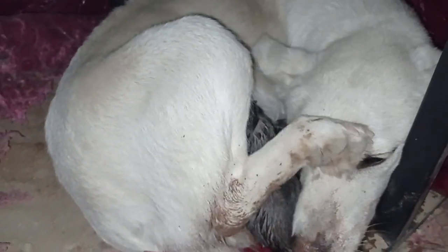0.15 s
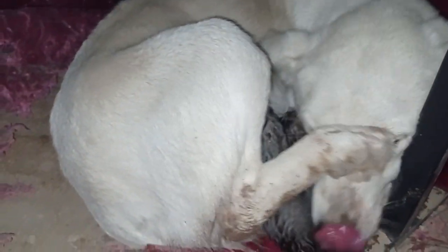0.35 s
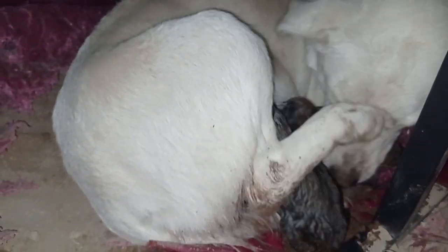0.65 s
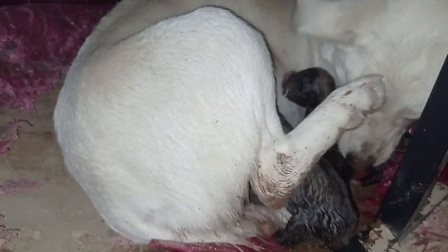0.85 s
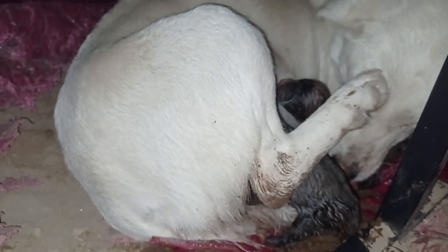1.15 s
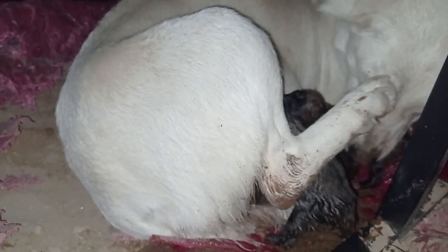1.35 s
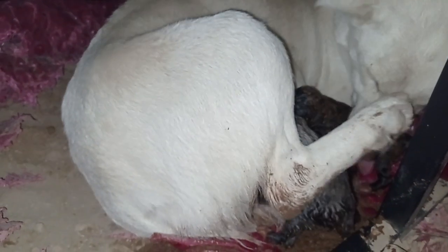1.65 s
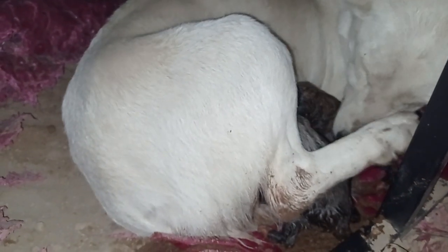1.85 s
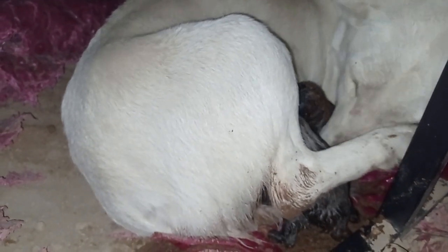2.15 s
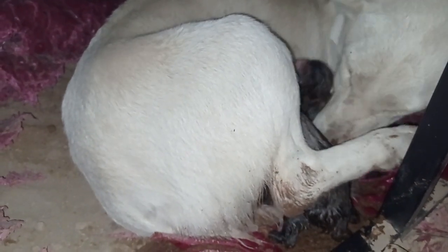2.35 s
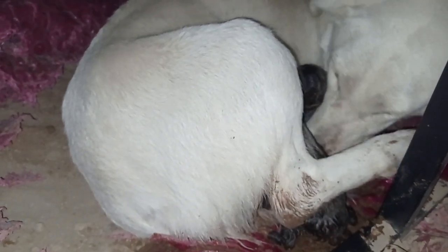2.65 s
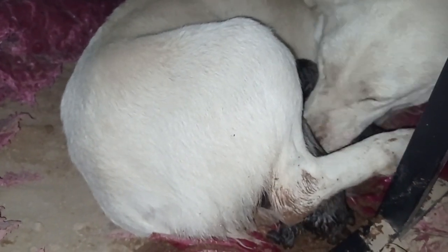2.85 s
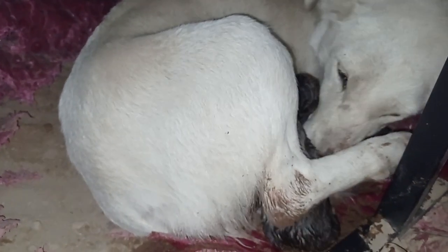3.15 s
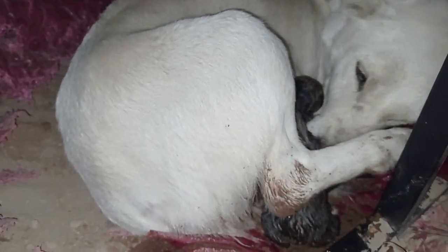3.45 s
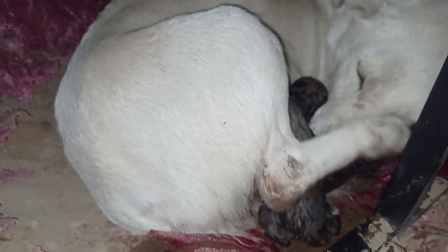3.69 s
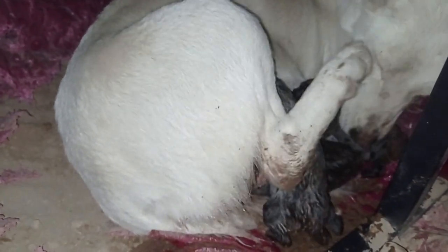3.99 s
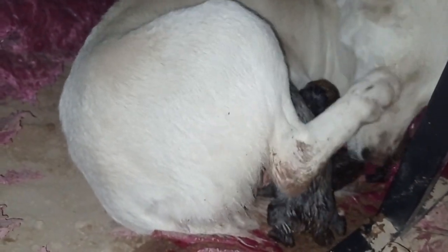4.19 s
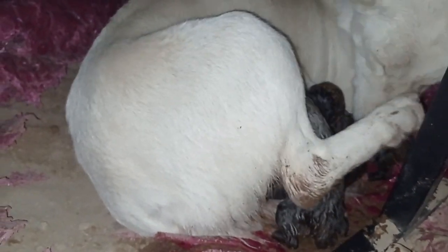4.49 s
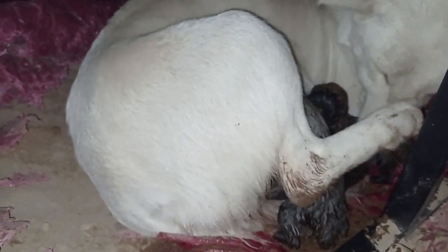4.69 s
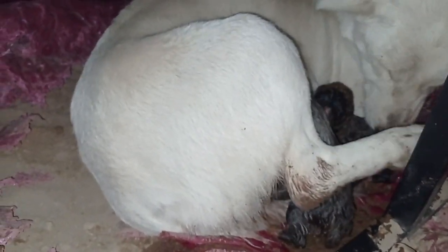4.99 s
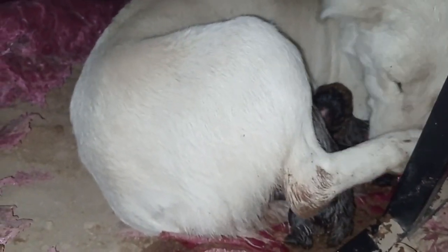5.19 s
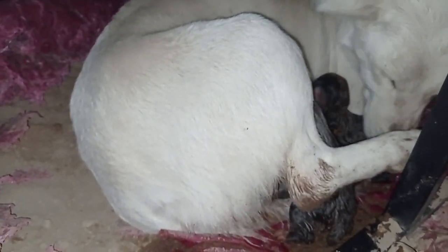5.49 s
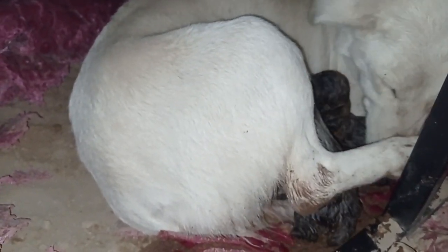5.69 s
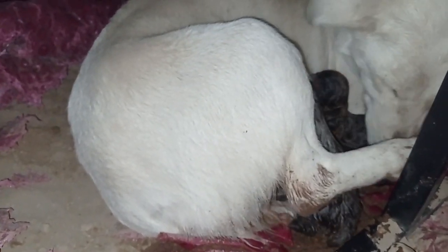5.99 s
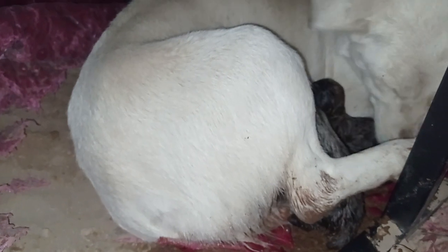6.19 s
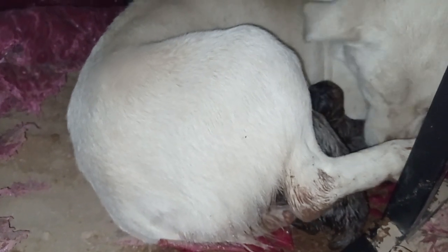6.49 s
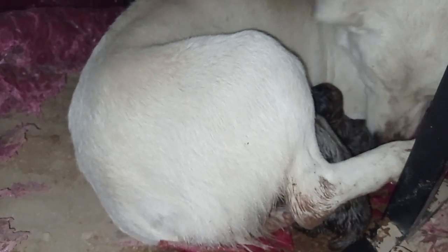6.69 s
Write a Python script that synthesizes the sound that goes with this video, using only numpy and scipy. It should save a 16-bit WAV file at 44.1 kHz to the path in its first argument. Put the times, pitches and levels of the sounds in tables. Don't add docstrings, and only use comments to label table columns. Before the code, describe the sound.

Wet licking begins softly, then a tiny pup cries with a high, wobbling squeal. Licking continues with dull slaps, rounded pops and crisp little ticks over rubbing fur. A second squeal peaks early and sinks away; a third climbs to a strained peak and falls. Only licks and short grunts follow. Very close, indoors, over a quiet low room hum.

```python
import sys
import numpy as np
from scipy import signal
from scipy.fft import irfft
from scipy.io import wavfile
from scipy.ndimage import uniform_filter1d

SR = 44100
rng = np.random.default_rng(int(sys.argv[2]) if len(sys.argv) > 2 else 0)


def attenuation_scalar(level_db):
    decades = np.asarray(level_db, float) / 20
    return 10 ** decades


def dump(signal):
    limited = np.clip(np.atleast_2d(signal).T, -1, 1)
    pcm = np.round(limited * 32767).astype(np.int16)
    wavfile.write(sys.argv[1], SR, pcm)


N = 301644

# time in seconds, pitch in Hz, effort in dB,
# jaw in dB that lifts the 2nd partial, edge in dB of the upper partials.
CRY_WAVERING = [
    (0.435, 592, -46, 5.5, -2),
    (0.543, 637.3, -38, 5.5, -6.5),
    (0.633, 609, -29.5, 5, -12.5),
    (0.706, 542, -34, 3, -12),
    (0.862, 608.4, -32, 0.5, -11.5),
    (0.988, 622.7, -30, -0.5, -18),
    (1.084, 489, -39.5, 3, -8),
    (1.18, 559, -33, 4.2, -8.5),
    (1.33, 525, -33, 2.5, -11),
]
CRY_BREAKING = [
    (2.834, 598, -45.5, -12, -3.5),
    (3.04, 698, -28, -9, -12.5),
    (3.125, 614.3, -28.5, -9.5, -16.5),
    (3.213, 619, -34, -10, -6),
    (3.388, 607.8, -31.5, -3, -12.5),
    (3.52, 592, -32, -3, -11),
    (3.624, 478.6, -40, 4, -12),
    (3.694, 446, -45, 5, -11.5),
    (3.745, 370, -44, -8, -22),
]
CRY_CLIMBING = [
    (4.455, 571, -45.5, 3, -1.5),
    (4.592, 588, -36, 1, -4.5),
    (4.659, 544, -40, 4, -2),
    (4.829, 592.3, -36, 3, -2.5),
    (5.136, 639.6, -28.5, -5.5, -20.5),
    (5.283, 675.7, -27, -19, -23.5),
    (5.36, 595, -29, -5, -19),
    (5.507, 495.4, -37.5, 3, -15),
    (5.595, 402, -44, -5, -9),
]
WHIMPER = [
    (4.3, 850, -76, 4, -8),
    (4.36, 820, -68, 6, -10),
    (4.395, 910, -67, 5, -10),
]
CREAK = [
    (6.746, 221, -63, 3, 0),
    (6.785, 353.6, -51, 0, -7),
    (6.807, 458, -36, -1, -23),
    (6.825, 403, -34.5, -9, -28),
    (6.85, 500, -37, -16, -26),
]
# start in seconds, length in seconds, effort in dB, pitch in Hz.
GRUNTS = [
    (1.905, .088, -35, 435),
    (6.252, .037, -35, 420),
]
# share of its length, pitch ratio, effort in dB, jaw in dB, edge in dB.
GRUNT_SHAPE = [
    (0, 1.02, -20, -3, 6),
    (.22, 1.22, -5.5, 1.5, -6),
    (.36, 1.02, -0.5, -6.5, -18.5),
    (.6, .99, -1.5, -26, -26),
    (1, 1.06, -24, -30, -17),
]
# time in seconds, half width in seconds, pitch ratio,
# overtone change in dB, rasp of leaking air in dB.
SLIPS = [(1.0, .025, .98, 3, 14), (1.262, 0.029, .96, -6, 14), (1.319, .006, .84, -3, 4),
         (1.325, .024, 1.0, -8, 35), (6.256, .008, 1.14, 0, 0), (1.035, .03, .965, 0, 0),
         (3.44, .025, .987, 0, 0), (4.88, .02, .988, 0, 0), (5.02, .04, 1.013, 0, 0),
         (5.565, .025, .972, 0, 6), (5.325, .03, .984, 0, 0), (3.08, .027, 1.26, -12, 28),
         (3.276, .04, .955, -1.5, 1.5), (3.75, .02, .97, -3, 22), (4.485, .022, 1.018, 0.5, 1.5),
         (4.53, 0.0179, .985, 1.5, 0.5), (5.442, 0.029, 0.98, -7, 12), (5.59, .025, .99, 1.5, 18)]
# frequency in Hz, level in dB.
THROAT = [(1800, 1), (2500, 1), (3100, -3.5), (4400, -23.5), (5500, -32), (6700, -21), (7800, -26),
          (9100, -24), (11000, -32.5), (15000, -38.5)]
# frequency in Hz, level in dB.
THIRD = [(1300, -9), (1500, -11), (1700, -8.5), (1850, -15), (1980, -13), (2090, -6.5), (2450, -18.5)]
# time in seconds, opening in dB that lifts the 3-4 kHz partials,
# strain in dB that lifts those above.
MOUTH = [(.45, -10, 6), (.6, -11.5, 5.5), (.85, -21, -10), (0.998, -7.5, 8.5), (1.2, -4.5, 4.5),
         (2.95, -11.5, 2.5), (3.15, -7, -1.5), (3.45, -1.5, 6.5), (3.65, 6, 3), (4.6, -8, -5),
         (4.9, -5, -4), (5.15, 8.5, 14), (5.349, 8.5, 16), (5.5, -1, -11), (6.8, -34, -12)]
# time in seconds, half width in seconds, frequency in Hz, change in dB.
SHADES = [(.6, .05, 1850, -3), (.6, .05, 2450, 3), (.75, .05, 1700, -2), (.75, .05, 2250, 2),
          (.92, .05, 3080, -14), (1.0, .02, 1750, -5), (1.01, .03, 2800, 6), (1.11, .03, 1900, -4),
          (1.2, .03, 2200, -5), (1.285, .04, 2640, 11), (1.327, .013, 960, -18), (1.333, .016, 1560, -12),
          (1.285, .03, 1570, -9), (1.28, .04, 2090, -10), (1.92, .015, 2900, 14), (1.945, .01, 1050, -10),
          (2.86, .04, 1820, -6), (2.94, .07, 2600, 5), (2.93, .03, 1950, 5), (2.96, .02, 1320, -5),
          (3.01, .04, 3400, -10), (3.04, .015, 2800, -12), (3.08, .025, 1640, 5), (3.079, .014, 2460, 9),
          (3.205, .035, 3100, -19), (3.235, .02, 1820, -9), (3.36, .03, 1820, -8), (3.48, .07, 1780, 5),
          (3.48, .06, 3570, 10), (3.56, .02, 1120, -5), (3.585, .03, 3200, 8), (3.65, .05, 2250, -8),
          (3.7, .04, 3000, 6), (4.45, .045, 1650, -10), (4.82, .04, 1780, -4), (4.94, .04, 2430, 4),
          (5.06, .04, 1890, 4), (5.12, .02, 2550, -8), (5.21, .05, 1970, 3), (5.26, .035, 2670, 7),
          (5.31, .03, 3250, -11), (5.32, .015, 1890, -7), (5.4, .02, 2280, -11), (5.52, .02, 1910, -9),
          (6.257, .012, 1000, 11), (6.262, .018, 1400, -12), (6.268, .012, 1800, 13),
          (6.765, .035, 1000, 20), (6.812, .03, 1800, 22), (6.82, .022, 1300, -14)]
MORE_SHADES = [(1.2, .07, 3350, -9), (1.2, .04, 3870, -9), (3.08, .03, 3200, 8), (3.56, .04, 2250, -6),
               (3.56, .04, 2780, -7), (5.3, .015, 1310, -10), (4.46, .02, 3650, -14), (3.28, .04, 590, -3),
               (3.08, .025, 820, 2.5), (4.7, .04, 3850, -11), (.93, .03, 2450, 4), (3.32, .2, 4400, 8),
               (3.4, .13, 5400, -9), (.56, .09, 3750, -7), (.56, .1, 5000, -6), (.55, .06, 6250, -6)]

# time in seconds, peak in dB, cavity in Hz.
SLAPS = [(0.1306, -46, 385), (.68, -40, 897), (1.6813, -47, 500), (1.9345, -35, 620), (2.3285, -39.5, 890),
         (2.671, -30, 840), (2.8822, -34, 882), (3.105, -29, 760), (3.1862, -29, 1020),
         (3.3937, -38.5, 360), (3.586, -34.5, 590), (4.0091, -32.5, 526), (4.0352, -42, 1100),
         (4.049, -42.5, 418), (4.2435, -39, 1900), (4.5178, -14.5, 1890), (4.731, -42, 890),
         (5.13, -35, 500), (5.94, -38.5, 576), (5.9987, -40.5, 302), (6.0147, -39.5, 625),
         (6.2164, -47.5, 280), (6.266, -32, 800), (6.4602, -43.5, 710), (6.5647, -44, 820)]
# time in seconds, peak in dB, cavity in Hz.
POPS = [(0.0936, -39.5, 1300), (0.1176, -36, 533), (0.1567, -43, 640), (0.2634, -37.5, 1520),
        (1.0137, -39, 2940), (1.3018, -38, 2600), (1.316, -30, 1100), (2.3111, -44, 1490),
        (2.4098, -38.5, 566), (2.4214, -41.5, 1150), (2.5259, -43, 1970), (2.7864, -33.5, 820),
        (2.9102, -23, 2450), (5.9051, -35, 680), (2.9518, -37, 1653), (3.7478, -37, 420),
        (3.7943, -45, 1140), (3.8081, -35.5, 745), (3.8632, -37.5, 736), (4.1469, -38.5, 714),
        (4.1789, -41, 1190), (4.7746, -32, 3050), (5.02, -37, 700), (5.151, -35, 520), (5.444, -32, 736),
        (5.5953, -33.5, 950), (6.3695, -42.5, 805), (6.5386, -45.5, 1600), (6.6794, -40, 660)]
# time in seconds, peak in dB, cavity in Hz.
PLOPS = [
    (1.028, -39, 603),
    (1.7952, -47.5, 1390),
    (1.9672, -44, 1650),
    (2.3401, -43, 660),
    (2.5027, -40.5, 661),
    (4.0004, -39, 650),
    (4.016, -41.5, 364),
    (5.6047, -34, 596),
    (6.3478, -47, 754),
]
# time in seconds, peak in dB, cavity in Hz.
GULPS = [
    (1.398, -52, 520),
    (1.447, -50, 620),
    (2.097, -46, 640),
    (3.87, -50, 800),
    (5.125, -39, 480),
    (4.002, -46, 1720),
    (5.992, -41, 520),
    (6.541, -43, 420),
    (6.592, -52, 620),
]
# time in seconds,
# peak in dB, cavity in Hz.
MORE_POPS = [(1.386, -50, 1400), (1.481, -50, 400), (1.591, -48, 620), (1.964, -42, 2200), (2.044, -47, 600),
             (2.153, -52, 2900), (2.163, -50, 550), (3.038, -38, 1000), (3.307, -42, 950), (3.36, -42, 420),
             (3.483, -41, 420), (3.549, -41, 450), (3.562, -39, 700), (3.573, -37, 750), (3.778, -48, 450),
             (3.84, -50, 650), (5.33, -48, 5000), (5.388, -40, 800), (5.48, -38, 1200), (5.542, -42, 900),
             (5.627, -45, 1300), (5.628, -48, 8600), (5.83, -55, 1100), (6.402, -48, 600), (6.461, -48, 2000),
             (6.474, -46, 900), (6.525, -48, 600), (6.539, -44, 3500), (6.556, -46, 2600), (6.683, -48, 1700),
             (6.694, -49, 900), (6.737, -52, 900), (.027, -48, 700), (.094, -52, 6000), (.16, -49, 8500),
             (.357, -46, 750), (.366, -48, 9000), (1.309, -37, 2100), (2.295, -49, 900), (2.303, -49, 1500),
             (2.363, -51, 7000), (2.41, -45, 9000), (2.43, -43, 900), (2.535, -46, 700), (2.562, -51, 4000),
             (3.8, -51, 9500), (3.863, -51, 5000), (3.9, -49, 7000), (4.137, -47, 700), (4.322, -50, 2500),
             (5.052, -42, 800), (5.903, -49, 8000), (6.478, -51, 7500)]
# time in seconds, peak in dB, frequency in Hz.
TICKS = [(0.0084, -38.5, 10500), (0.0272, -31.5, 9100), (0.2608, -33.5, 8140), (0.5656, -35, 9300),
         (5.541, -40, 7000), (1.3004, -33, 4513), (3.915, -43, 6300), (1.6202, -39, 9350),
         (1.6955, -41.5, 9210), (1.732, -31.5, 8700), (1.805, -38, 8700), (1.962, -34, 8100),
         (2.0996, -45.5, 6000), (2.1607, -44, 8550), (2.4199, -35.5, 9500), (2.6479, -43, 9160),
         (2.6702, -39.5, 7960), (4.7272, -28.5, 8610), (4.773, -37, 7040), (5.3986, -34, 9500),
         (5.5584, -34, 9100), (5.5887, -39, 8300), (5.8568, -34.5, 9300), (5.937, -40, 6460),
         (5.96, -40, 9000), (6.3689, -40, 8400), (6.5227, -39, 7050), (6.538, -28.5, 8800),
         (6.555, -38, 8600)]
# time of strongest drag in seconds, time to fade 10 dB in seconds,
# level in dB, wetness in dB of hiss over rustle.
STROKES = [(0.06, 0.7, -59, -1.5), (0.34, 0.34, -54.5, -1), (0.69, 0.17, -51, -3.5), (1.0, 0.34, -60, 3),
           (1.28, 0.08, -50, 0), (1.5, .55, -54.5, -4), (1.94, 0.15, -51, -8.5), (2.32, .05, -56, -10),
           (2.429, 0.07, -50, -7.5), (2.52, 0.05, -58.5, -11), (2.7, .09, -50.5, -8),
           (2.81, .16, -47.5, -10), (3.1, 0.15, -51.5, 2), (3.45, 0.36, -54.5, -7), (3.71, 0.05, -51.5, -7),
           (4.031, .045, -49.5, -7.5), (4.23, 0.22, -58, 1.5), (4.33, 0.03, -58, -12),
           (4.52, 0.05, -44.5, -17), (4.76, 0.14, -54, -22), (4.97, 0.24, -60, 2), (5.14, 0.1, -51, 2.2),
           (5.44, .14, -49.5, .6), (5.59, .06, -48.5, -13), (6.0, 0.08, -55.5, -2.2),
           (6.29, 0.08, -50.5, -6), (6.471, 0, -52, -6), (6.549, 0.0254, -47, -4), (6.73, 0.14, -64.5, 3),
           (6.8, 0.05, -45, -16), (3.63, .14, -62, 6), (5.63, .03, -58, 1), (5.83, .12, -59.5, -4),
           (6.31, .05, -62, 7), (6.78, .08, -66, 6)]
# frequency in Hz, level in dB per Hz.
RUSTLE = [(120, 4.5), (300, -22), (600, 5), (1200, -1.5), (2700, -2.5), (4300, -24), (9000, -25)]
# frequency in Hz, level in dB per Hz.
HISS = [(2500, -9.5), (5000, -9.5), (7300, -5.5), (8900, 2.5), (10500, -7), (12500, -14), (16000, -9)]

# frequency in Hz, left minus right in dB.
NEAR_LEAN = [(700, 0), (1150, -3), (1800, 4.2), (2400, 0), (3600, 4), (6000, 0)]
# frequency in Hz, left minus right in dB.
PORT_LEAN = [(100, 2), (700, 0.45), (1290, -1), (3000, 4.5), (9000, -2)]
# frequency in Hz, left-right likeness as a share.
SAME = [(60, 0.76), (400, 0.61), (1400, 0.21), (5000, 0.01)]
# frequency in Hz, level in dB per Hz.
HUM = [(40, -44), (58, -18), (78, -4), (101, 5.5), (125, -8.5), (210, -5), (600, -13), (1600, -25),
       (4200, -26), (8800, -33), (11000, -28), (16000, -31)]

ATTACK_S, ATTACK_DB, SCOOP = .05, -22, .86
RELEASE_S, RELEASE_DB, CLOSING_DB = 0.023, -28, -15
PATCHY_DB, SHRILL_PATCHY_DB = 2.8, 3.5
SHADE_HZ = 230
SLAP_CYCLES, POP_CYCLES, PLOP_CYCLES, GULP_CYCLES = 2.05, 3.0, 4.2, 8.5
RISE_SHARE = .8
HUM_DB = -60.5


def cry(rows):
    s, hz, db, jaw, edge = rows[0]
    swell = [(s - ATTACK_S, hz * SCOOP, db + ATTACK_DB, jaw - 6, edge - 8),
             (s - .6 * ATTACK_S, hz * (.4 + .6 * SCOOP), db + .15 * ATTACK_DB, jaw - 7, edge - 9)]
    s, hz, db, jaw, edge = rows[-1]
    shut = (s + RELEASE_S, hz, db + RELEASE_DB, jaw + CLOSING_DB, edge + 0.33 * CLOSING_DB)
    return [*swell, *rows, shut]


def grunt(s, length, effort_db, pitch_hz):
    return [(s + share * length, pitch_hz * ratio, effort_db + db, jaw, edge)
            for share, ratio, db, jaw, edge in GRUNT_SHAPE]


def voice(rows):
    s, *columns = np.transpose(rows)
    step = 50
    t = np.arange(s[0], s[-1], step / SR)
    hz, effort_db, jaw_db, edge_db = (uniform_filter1d(np.interp(t, s, c), size=10) for c in columns)
    hz, slip_db, rasp_db = fold_slips(t, hz)
    upper_db = effort_db + edge_db + slip_db
    k = np.arange(1, 27)[:, None]
    levels = partials(t, k, hz, effort_db, jaw_db, edge_db, slip_db)
    hz = hz * (1 + 0.0045 * wander(count=1, size=20)[0, :len(t)])
    controls = np.repeat([hz, attenuation_scalar(upper_db + rasp_db), *levels], step, axis=1)
    hz, leak, *levels = uniform_filter1d(controls, step)
    turns = np.cumsum(hz) / SR
    tone = -np.sqrt(2) * (levels * np.cos(2 * np.pi * k * turns + 1.265 * k)).sum(0)
    sound = tone + leak * breath(turns)
    return s[0], sound * signal.windows.tukey(len(hz), 400 / len(hz))


def fold_slips(t, hz):
    slip_db, rasp_db = 0 * t, 0 * t
    for when, width, ratio, overtone_db, air_db in SLIPS:
        slip = np.exp(-((t - when) / width) ** 4)
        hz = hz * ratio ** slip
        slip_db = slip_db + overtone_db * slip
        rasp_db = rasp_db + air_db * slip
    return hz, slip_db, rasp_db


def partials(t, k, hz, effort_db, jaw_db, edge_db, slip_db):
    upper_db = edge_db + slip_db
    third_db = read(THIRD, 3 * hz) + 0.3 * (upper_db + 12) + 1.6 * np.minimum(jaw_db + 18, 0)
    low_db = effort_db + np.array([0 * hz, jaw_db, third_db])
    low = len(low_db)
    at, open_db, strain_db = np.transpose(MOUTH)
    wide = np.clip((k * hz - 2700) / 400, 0, 1)
    shrill = np.clip((k * hz - 3500) / 1600, 0, 1)
    lift_db = np.interp(t, at, open_db) * (wide - shrill)
    lift_db += (np.interp(t, at, strain_db) + slip_db) * shrill
    chance = wander(count=len(k), size=44)[:, :len(t)]
    patch_db = PATCHY_DB * chance + SHRILL_PATCHY_DB * shrill * np.minimum(chance - 0.3, 0)
    levels = attenuation_scalar(read(THROAT, k * hz) + lift_db + patch_db) * (k * hz < 16000) * (k > low)
    levels *= attenuation_scalar(effort_db + upper_db) / np.sqrt((levels ** 2 * (k * hz < 4000)).sum(0))
    levels[:low] = attenuation_scalar(low_db + np.array([[0.3], [0.9], [1.2]]) * chance[:low])
    when, width, band_hz, shade_db = np.transpose(SHADES + MORE_SHADES)[..., None, None]
    in_time = np.exp(-((t - when) / width) ** 2)
    in_band = np.exp(-((k * hz - band_hz) / SHADE_HZ) ** 2)
    return levels * attenuation_scalar((shade_db * in_time * in_band).sum(0))


def breath(turns):
    rough_db = 30.5 * (len(turns) < SR // 11)
    puffs = rng.standard_normal(len(turns)) * (0.35 + np.exp(-(turns % 1) / 0.26))
    band = signal.butter(2, [350 / (SR / 2), 3200 / (SR / 2)], "band")
    return attenuation_scalar(rough_db - 37.0) * evened(signal.lfilter(*band, puffs))


def wander(count, size):
    return drift((count, 1400), size)


def nose_whistle():
    glide = np.cumsum(np.geomspace(13000, 11100, 8800)) / SR
    return attenuation_scalar(-70) * np.hanning(len(glide)) ** .5 * np.sin(2 * np.pi * glide)


def licking(rustle, hiss):
    near = np.zeros(N)
    for table, cycles in ((SLAPS, SLAP_CYCLES), (POPS, POP_CYCLES), (PLOPS, PLOP_CYCLES),
                          (GULPS, GULP_CYCLES), (MORE_POPS, POP_CYCLES)):
        for s, db, hz in table:
            add(near, s - .0015, pop(db, hz, cycles))
    for s, db, hz in TICKS:
        add(near, s, tick(db, hz))
    tiny_pops = [pop(.6, hz, 2.04) for hz in np.geomspace(330, 1500, 6)]
    tiny_ticks = [tick(4, hz) for hz in (5500, 7500, 9200)]
    near += sprinkle(rustle, 108, 3.2, tiny_pops)
    near += sprinkle(hiss, 27, 2.4, tiny_ticks)
    return near


def pop(peak_db, hz, cycles):
    t = np.arange(2400) / SR
    u = t * hz / max(cycles, .8)
    shape = (np.e * 3.55 * u * np.exp(-3. * u)) ** 1.45
    turns = 2 * np.pi * cycles * u * (1.1 - 0.11 * np.minimum(u, 2))
    ring = shape * np.sin(turns)
    overtone = 0.09 * shape ** 2 * np.sin(2.36 * turns)
    crack = .1 / max(cycles - 1, 1) * np.exp(-t / .0004) * np.sin(2 * np.pi * 2800 * t)
    return -attenuation_scalar(peak_db) * (ring + overtone + crack)


def tick(peak_db, hz):
    t = np.arange(600) / SR
    puff = rng.standard_normal(600) * t * np.exp(-t / 0.00055)
    band = np.clip([0.76 * hz, 1.18 * hz], 100, 20000) / (SR / 2)
    wide = signal.lfilter(*signal.butter(3, band, "band"), puff)
    return attenuation_scalar(peak_db) * wide / abs(wide).max()


def sprinkle(level, per_s, spread_db, templates):
    snaps = np.zeros(N)
    when, size, which = rng.random((round(per_s * N / SR), 3)).T
    moments = when * (N - 1) / SR
    extra_db = spread_db * np.minimum(-np.log(size), 3)
    for s, db, k in zip(moments, extra_db, which * len(templates)):
        add(snaps, s, level[round(s * SR)] * attenuation_scalar(db) * templates[int(k)])
    return snaps


def strokes():
    s, fade, db, wet_db = np.transpose(STROKES)[..., None]
    t = np.arange(0, N + 200, 200) / SR
    drag = attenuation_scalar(db - 10 * abs(t - s) / (fade * np.where(t < s, RISE_SHARE, 1)))
    return [np.interp(np.arange(N) / SR, t, np.sqrt((g ** 2).sum(0))) for g in (drag, drag * attenuation_scalar(wet_db))]


def wet_fur(rustle, hiss):
    rubbing = rustle * noise(RUSTLE, 2.16, 2.4, size=512) * attenuation_scalar(-3)
    return rubbing + hiss * noise(HISS, 2.4, 2.5, size=512)


def ports(x):
    hz = np.fft.rfftfreq(4096, 1 / SR)
    direct = np.exp(-1j * np.outer([1, 0], 1.15 * np.tanh((hz / 1350) ** 1.9)))
    lean_db = np.outer([.5, -.5], read(NEAR_LEAN, hz))
    direct = direct * attenuation_scalar(lean_db - 1.2 * np.tanh((hz / 1800) ** 3))
    at = np.sort(rng.uniform(0.000983, .045, (2, 40)))
    echoes = rng.choice([-1, 1], at.shape) * attenuation_scalar(-60 * at / 0.031)
    room = (echoes[..., None] * np.exp(-2j * np.pi * hz * at[..., None])).sum(1)
    room = room / np.linalg.norm(echoes[0])
    taps = irfft(direct + room * attenuation_scalar(read([(700, -26), (1300, -13), (4000, -7)], hz)))
    lead = 256
    return signal.oaconvolve(x[None], np.roll(taps, lead, axis=1), axes=1)[:, lead:lead + N]


def room_hum():
    return attenuation_scalar(HUM_DB) * noise(HUM, 0.61, 0.1, size=4096)


def noise(colour, patchy_db, flicker_db, size):
    frames, hz = 4 * N // size + 5, np.fft.rfftfreq(size, 1 / SR)
    a, b, c, d, patches = rng.standard_normal((frames, len(hz), 5)).T
    patches = uniform_filter1d(patches, size=10, axis=0)
    patches = evened(uniform_filter1d(patches, size=14, axis=1))
    same = np.clip(read(SAME, hz), -1, 1)[:, None]
    left, other = a + 1j * b, c + 1j * d
    z = np.array([left, same * left + np.sqrt(1 - same ** 2) * other])
    z *= attenuation_scalar(read(colour, hz)[:, None] + patchy_db * patches + flicker_db * drift(frames, size=2))
    return evened(signal.istft(z, nperseg=size, noverlap=3 * size // 4)[1][:, :N])


def drift(shape, size):
    return evened(uniform_filter1d(uniform_filter1d(rng.standard_normal(shape), size), size))


def evened(x):
    return x / np.sqrt(np.mean(x ** 2) + 1e-20)


def read(points, hz):
    f, value = np.transpose(points)
    return np.interp(np.log(hz + 1), np.log(f + 1), value)


def add(mix, s, sound):
    part = mix[max(round(s * SR), 0):][:len(sound)]
    part += sound[:len(part)]


def scene():
    near = np.zeros(N)
    calls = [cry(rows) for rows in (CRY_WAVERING, CRY_BREAKING, CRY_CLIMBING)]
    calls += [WHIMPER, CREAK] + [grunt(*row) for row in GRUNTS]
    for rows in calls:
        add(near, *voice(rows))
    add(near, 1.69, nose_whistle())
    rustle, hiss = strokes()
    near += licking(rustle, hiss)
    return ports(near) + wet_fur(rustle, hiss) + room_hum()


def roll_off(x):
    return signal.sosfilt(signal.butter(12, 15830, fs=SR, output="sos"), x)


def record(dry):
    hz = np.linspace(0, SR / 2, 2049)
    edges = (hz < 15720) * hz ** 6 / (hz ** 6 + 54 ** 6)
    colour = irfft(edges * attenuation_scalar(np.outer([.5, -.5], read(PORT_LEAN, hz))))
    taps = np.roll(colour, 2048, axis=1) * np.hanning(4096)
    heard = signal.oaconvolve(dry, taps, "same", axes=1)
    return roll_off(heard)


dry = scene()
out = record(dry)
dump(out)
```